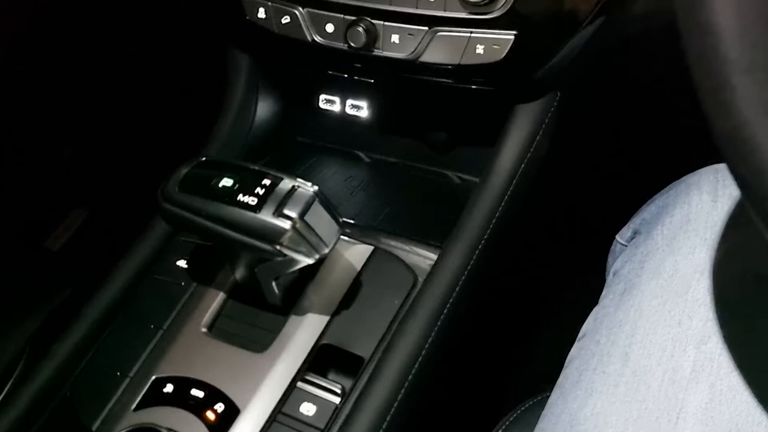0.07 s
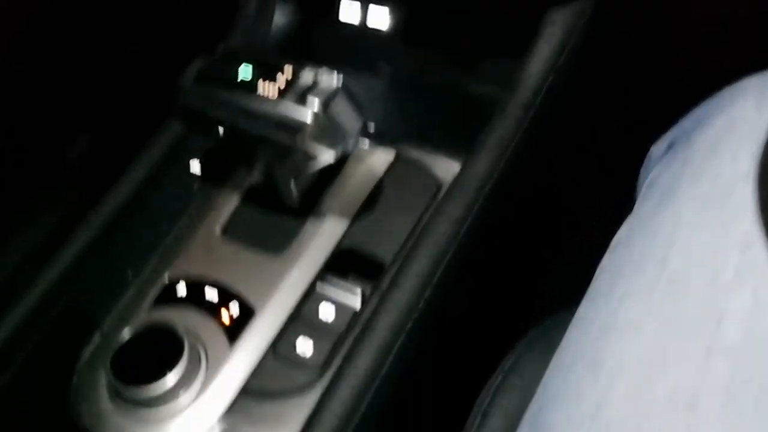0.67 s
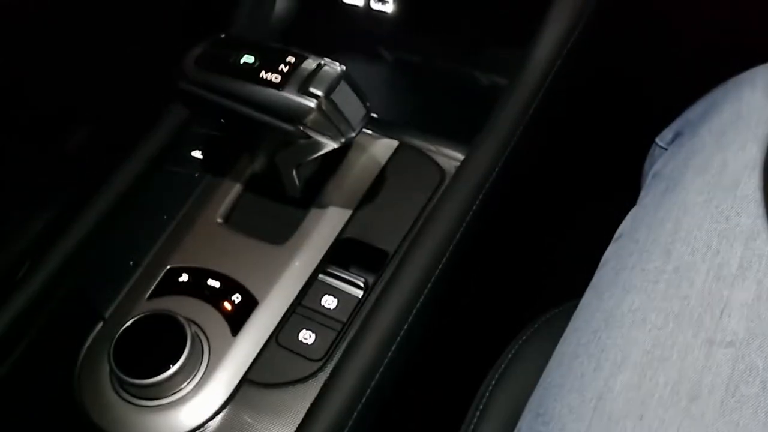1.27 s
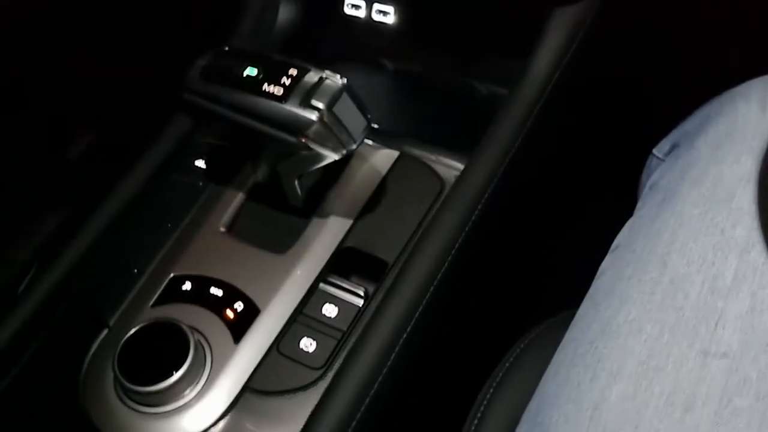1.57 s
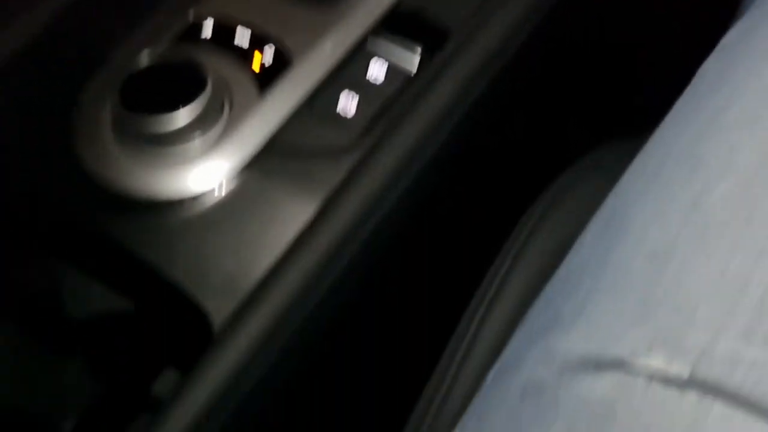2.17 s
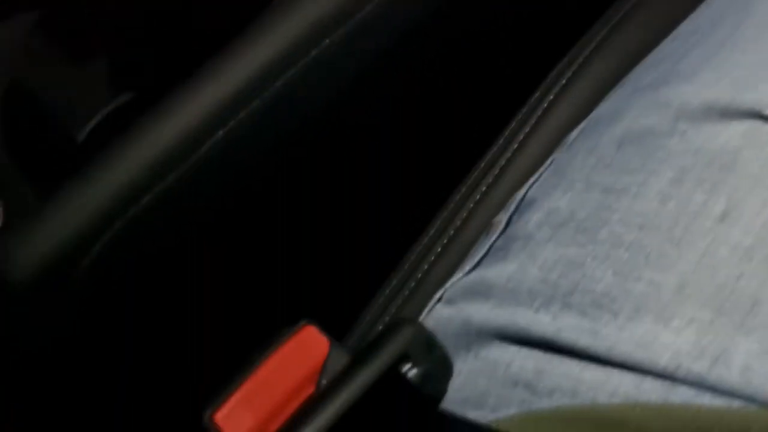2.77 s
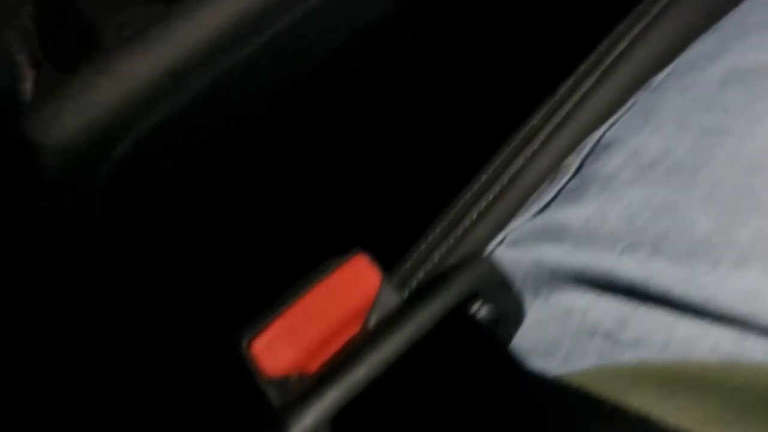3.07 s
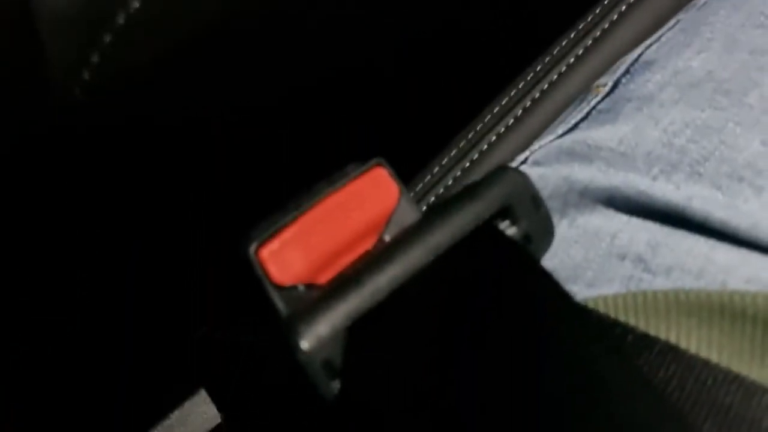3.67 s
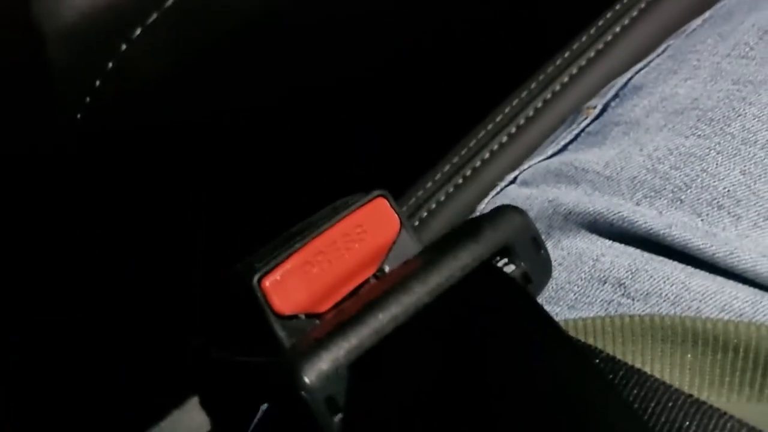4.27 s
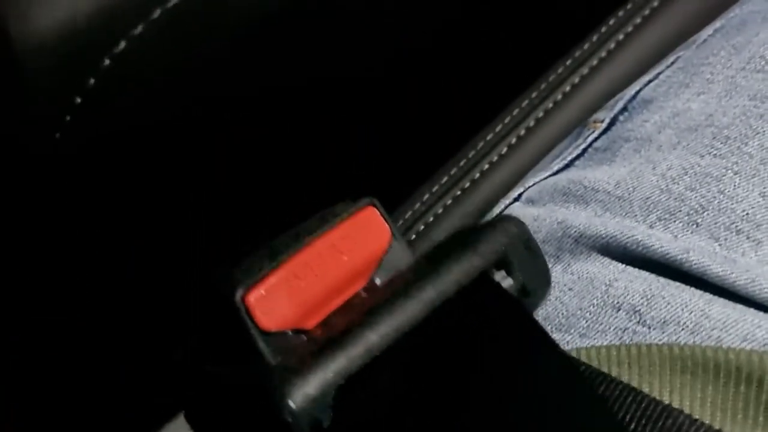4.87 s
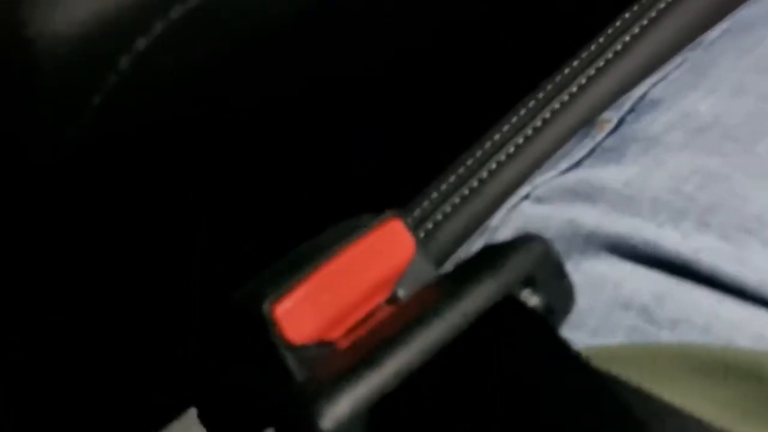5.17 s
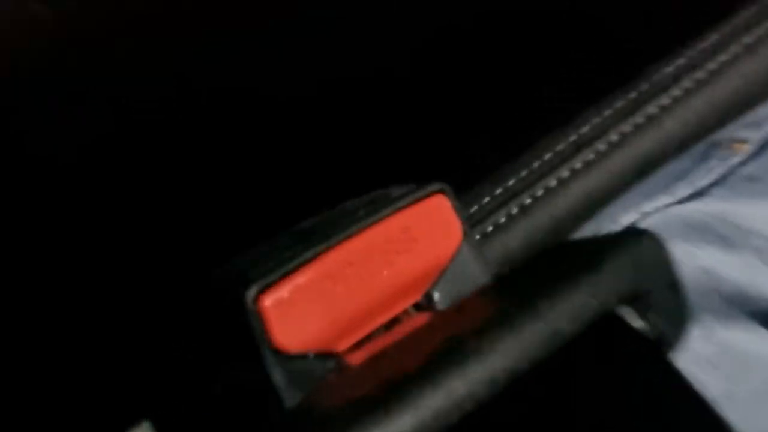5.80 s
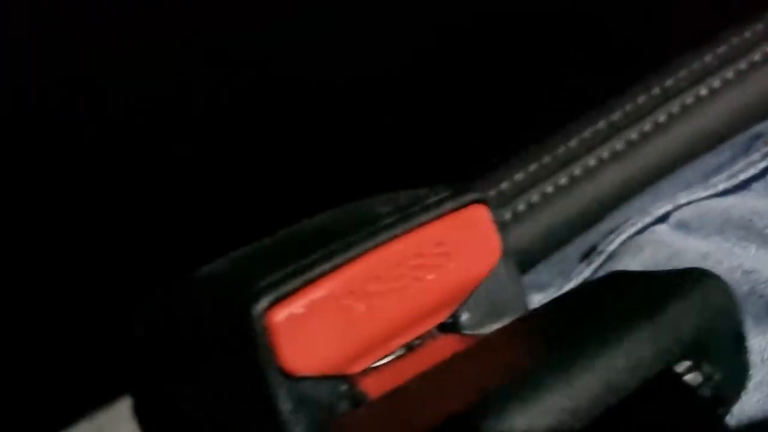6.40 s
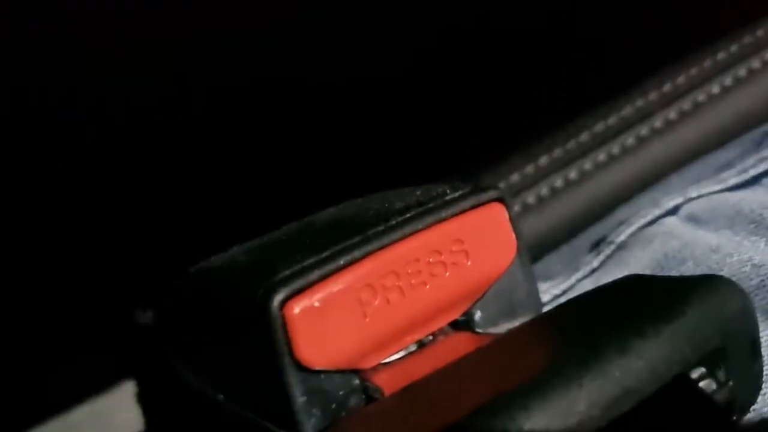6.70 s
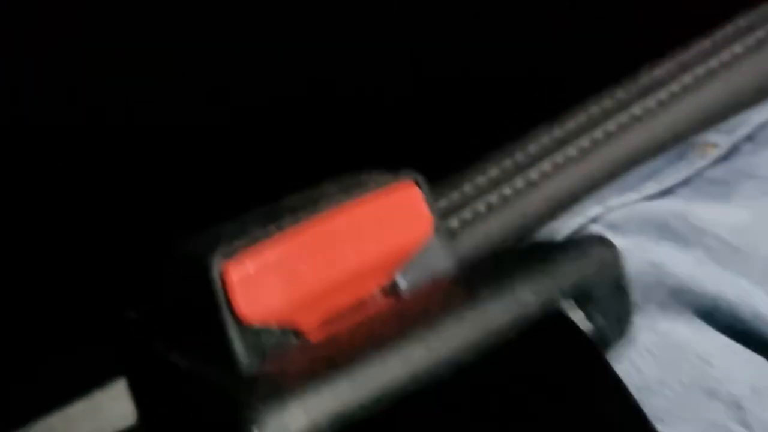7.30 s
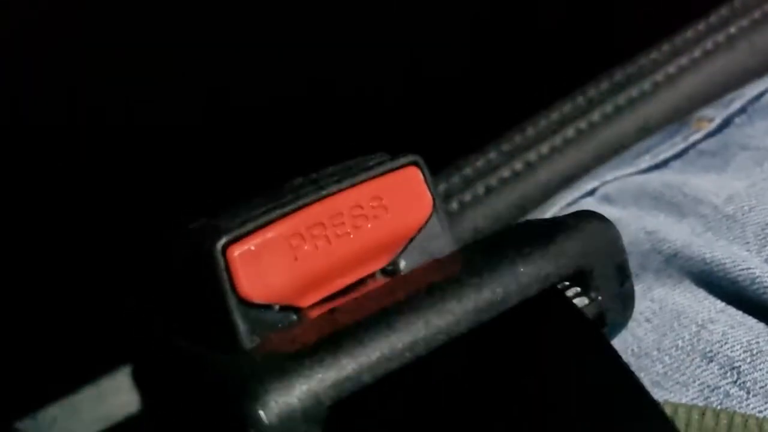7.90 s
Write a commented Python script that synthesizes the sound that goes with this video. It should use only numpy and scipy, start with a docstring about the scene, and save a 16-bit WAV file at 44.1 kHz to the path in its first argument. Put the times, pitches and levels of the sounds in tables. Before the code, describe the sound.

A latched seat belt buckle clicks in sharp, irregular bursts inside an idling car, with soft clothing rustle.

```python
"""Inside an idling car, someone jiggles a latched seat belt buckle.
The engine hums below, and clothes rustle as an arm moves and the hand taps the trim twice.
The buckle's steel tongue slips and catches in bursts of sharp clicks. Each click rings the plastic
housing and dies quickly among the padded seats. The later clicks sound closer and drier."""
import sys
import numpy as np
from scipy import signal
from scipy.fft import rfft, irfft, next_fast_len
from scipy.io import wavfile
from scipy.ndimage import uniform_filter1d, map_coordinates

SR = 44100
rng = np.random.default_rng(int(sys.argv[2]) if len(sys.argv) > 2 else 0)


def wav_out(sig):
    """Save sig, one row per channel (or a flat mono array), as 16-bit PCM at SR to the path in sys.argv[1]."""
    wavfile.write(sys.argv[1], SR, np.round(np.clip(np.atleast_2d(sig).T, -1, 1) * 32767).astype(np.int16))


N = 355005

# the tones in the engine's hum: multiple_of_firing_rate, level_db
HUM_TONES = [(1, -53), (2, -43.5), (3, -47.5), (4, -61), (5, -56), (6, -73)]
# the tone of the engine's rumble: pitch_hz, level_db
RUMBLE_SHAPE = [(20, -16.5), (50, 10.5), (110, 0.5), (170, -11.5), (270, -11.5), (365, -1), (450, -12),
                (545, -6), (630, -20), (720, -11.5), (830, -24), (1300, -21.5), (2000, -33), (3300, -38.5),
                (4500, -43.5), (16000, -59)]
# the rumble grows as the listener sinks between the seats: time_s, gain_db
RUMBLE_GROWTH = [(0, -3.5), (1.8, -1), (3, 0), (6, 0.9), (8, 0)]
# a thin whine under the dashboard: pitch_hz, level_db
WHINE_SHAPE = [(2300, -40.5), (2780, -3), (2860, -3), (2950, -22), (3500, -50.5)]
# how alike a noise is in both ears: pitch_hz, likeness (1 same, -1 opposite)
EAR_LIKENESS = [(60, 0.55), (130, 0.45), (300, 0.68), (640, -0.31), (1400, -0.34), (3100, -0.16),
                (7000, -0.02)]
# strokes of cloth on cloth: start_s, length_s, rub_db, hiss_over_rub_db
CLOTH_STROKES = [(0.524, 0.2, -66.5, -17), (0.588, 0.047, -64, -1), (0.884, .03, -68, -4),
                 (1.01, .05, -72.5, -5), (1.183, .02, -71, -7), (1.793, 0.099, -57.5, -4),
                 (1.965, 0.22, -62.5, -6), (2.254, 0.072, -62, -11), (2.454, 0.22, -59.5, -8.5),
                 (2.873, 0.22, -62.5, -8), (3.15, 0.4, -61, -5), (3.586, 0.2, -56, -8),
                 (3.94, 0.054, -59, -7), (4.18, 0.28, -63.5, -3.5), (4.492, 0.2, -61.5, -4.5),
                 (4.93, 0.041, -58.5, -5.5), (5.048, 0.065, -60, -4), (5.23, 0.11, -64.5, -5),
                 (5.48, 0.18, -56.5, -6.5), (5.738, 0.23, -60.5, -0.5), (6.05, .28, -71, -6.5),
                 (6.41, 0.097, -62, -6), (6.676, 0.055, -61, -7), (7.01, 0.13, -61, -5),
                 (7.185, .27, -62, -5.5), (7.74, 0.091, -75.5, -7.5), (7.899, 0.048, -61, -5.5)]
# the cloth's low rub, higher hiss and highest fizz: pitch_hz, level_db
RUB_SHAPE = [(200, -10), (600, 1), (1200, 2), (2300, 0), (3200, 1), (4000, -3.5), (6000, -15.5),
             (10000, -37)]
HISS_SHAPE = [(2500, -14.5), (5000, -3.5), (8000, -6.5), (9500, -11), (11000, -25.5)]
FIZZ_SHAPE = [(7000, -32.5), (10000, 2), (14000, 7.5), (16000, 0.5)]
# the gliding centre of the cloth's swish: time_s, pitch_hz
SWISH_GLIDE = [(3.1, 2450), (3.5, 2900), (3.8, 3150), (4.5, 3350), (5.55, 3350), (5.8, 2950), (6.7, 3450),
               (7.9, 3150)]
# soft taps of the hand: start_s, level_db
HAND_TAPS = [(2.497, -27.5), (2.663, -33)]
# the tongue catching in the latch: start_s, level_db
LATCH_CLICKS = [(3.9741, -14.5), (3.988, -14.5), (3.9976, -13.5), (4.0104, -17), (4.025, -15.5),
                (4.0487, -15.5), (4.1672, -12.5), (4.2113, -17.5), (4.2463, -20), (4.2768, -23),
                (4.335, -25), (5.0597, -20), (5.0775, -18.5), (5.0972, -19.5), (5.1215, -19),
                (5.1466, -19.5), (5.4346, -11), (5.4654, -20), (5.4835, -24.5), (5.4996, -25.5),
                (5.521, -29.5), (6.4834, -15.5), (6.5006, -17), (6.521, -16.5), (6.6535, -15),
                (7.028, -9.5), (7.0716, -16), (7.0953, -22), (7.1167, -24.5), (7.1458, -28.5), (7.199, -27),
                (8.0444, -21)]
# the tone of steel meeting steel: pitch_hz, level_db
SNAP_SHAPE = [(150, -24), (1000, -11), (2500, -10.5), (3000, -20.5), (3700, -8), (4300, -4), (6500, -1.5),
              (7900, 3), (8800, -8.5), (11500, -20.5), (13200, -15), (16000, -35)]
# the buckle's ringing tones: pitch_hz, level_db, fade_s (time to fall 60 dB)
BUCKLE_TONES = [(205, -21, 0.068), (458.6, -21, .11), (727, -26, 0.046), (1063, -11, 0.062),
                (1390, -25, 0.08), (1807, -17, 0.049), (2243, -15.5, 0.052), (2991, -7.5, 0.026),
                (3092, -15.5, 0.054), (3280, -31.5, 0.076), (4165, -12, 0.05), (5120, -25, 0.057),
                (5134, -17, .05), (5530, -32, 0.071), (6020, -20.5, 0.058), (6200, -13, 0.095),
                (6940, -35, .04), (7900, -25.5, 0.034), (7770, -11.5, 0.062), (13680, -17, 0.014)]
# the tone of the cabin's echo: pitch_hz, level_db
ECHO_SHAPE = [(120, -4), (220, 7), (310, -8), (500, 0), (900, 2.5), (1300, 6), (3100, -5), (3700, -9),
              (4300, -9.5), (8000, -2), (8900, -15.5), (13500, -9.5), (16000, -24)]
# how long the echo takes to fall 60 dB: pitch_hz, fade_s
ECHO_FADE = [(200, 0.12), (1000, 0.087), (4000, 0.084), (8000, 0.062), (14000, 0.016)]
# the listener closes in on the buckle: time_s, nearness (0 to 1)
APPROACH = [(5.5, 0.05), (6.3, 0.99)]
# hard, close clicks have less echo and ring: usual_db, db_per_force_db, close_up_db
ECHO_RULE = (1.8, -.25, -3.5)
# soft clicks are hollow, hard ones bright, and close up the housing's slot stands out:
# pitch_hz, usual_db, db_per_force_db, close_up_db
TONE_RULES = [(200, 1, -0.16, 1.5), (481, -2, -0.1, 4.5), (750, -2, 0.2, 0.5), (1000, 0, -0.13, -6.5),
              (1300, -2, 0, 2.5), (1807, -2.5, 0.08, 1.5), (2285, -1, -0.16, 0), (3000, -2, 0.06, 6),
              (3700, 0, 0, 2.5), (4300, -0.5, 0, 0), (8000, .5, 0.5, -1.5), (11000, 3, 0.5, -5.5),
              (13200, 5.5, .5, -4)]


def amp(db):
    """Turn decibels into a gain."""
    return 10 ** (np.asarray(db) / 20)


def unit(x):
    """Scale a sound to an average power of 1."""
    return x / np.sqrt(np.mean(x ** 2) + 1e-20)


def at_pitch(points, hz):
    """Read between (pitch_hz, value) points on a log pitch scale."""
    pitches, values = np.transpose(points)
    return np.interp(np.log(hz + 1), np.log(pitches + 1), values)


def over_time(points):
    """Join (time_s, value) points into one value per sample."""
    return np.interp(np.arange(N) / SR, *np.transpose(points))


def wobble(rate_hz):
    """A smooth curve through rate_hz random values a second."""
    values = rng.standard_normal(int(N * rate_hz / SR) + 4)
    return map_coordinates(values, [np.arange(N) * rate_hz / SR])


def filtered(x, gain_at):
    """Turn each frequency of a full-length sound up or down."""
    size = next_fast_len(N + SR // 2)
    return irfft(rfft(x, size) * gain_at(np.fft.rfftfreq(size, 1 / SR)), size)[..., :N]


def coloured(x, shape, size=16384):
    """Give a short sound the tone of a (pitch_hz, level_db) shape."""
    cepstrum = irfft(np.log(amp(at_pitch(shape, np.fft.rfftfreq(size, 1 / SR)))))
    cepstrum[1:size // 2] *= 2  # fold the filter so nothing sounds before the hit
    cepstrum[size // 2 + 1:] = 0
    return irfft(rfft(x, size) * np.exp(rfft(cepstrum)))[..., :x.shape[-1]]


def add(track, start_s, sound):
    """Mix a stereo sound into the track."""
    span = track[:, round(start_s * SR):][:, :sound.shape[1]]
    span += sound[:, :span.shape[1]]


def rush(shape, patchy_db):
    """Stereo noise with louder and softer patches, most alike in both ears in the bass."""
    spectra = signal.stft(rng.standard_normal((2, N)), nperseg=512)[2]
    patches = uniform_filter1d(rng.standard_normal(spectra.shape[1:]), size=6, axis=0)
    patches = uniform_filter1d(patches, size=10, axis=1)
    noise = signal.istft(spectra * amp(patchy_db * unit(patches)), nperseg=512)[1][:, :N]

    def gains(hz):
        spread = np.arccos(np.clip(at_pitch(EAR_LIKENESS, hz), -1, 1)) / 2
        return amp(at_pitch(shape, hz)) * np.array([np.cos(spread), np.sin(spread)])

    mid, side = filtered(noise, gains)
    return unit(np.array([mid + side, mid - side]))


def engine(firing_hz=25.03):
    """The engine's firings boom in the cabin as a hum and a throbbing rumble, with a thin whine above."""
    phase = 2 * np.pi * np.cumsum(firing_hz * (1 + .001 * wobble(3))) / SR
    smear = np.pi / 6  # deep tones build up late in the cabin, blending the thumps into a hum
    hum = sum(amp(db) * np.sqrt(2) * np.cos(round(k) * phase + smear * round(k) ** 2)
              for k, db in HUM_TONES)
    purr = sum(amp(at_pitch(RUMBLE_SHAPE, k * firing_hz)) * np.cos(k * phase + rng.uniform(0, 2 * np.pi))
               for k in range(7, 42))
    # four unequal cylinders
    throb_db = 1.4 * np.sin(phase) + 2.1 * np.sin(2 * phase) + .46 * np.sin(phase / 4)
    rumble = amp(-51) * rush(RUMBLE_SHAPE, patchy_db=0) + amp(-61) * unit(purr)
    rumble *= amp(throb_db + over_time(RUMBLE_GROWTH))
    whine = amp(-76) * rush(WHINE_SHAPE, patchy_db=-3)
    return hum * amp([[-.25], [.25]]) + rumble * amp([[.8], [-.8]]) + whine


def arm_strokes(rise_db_per_s=175.5, fall_db_per_s=136):
    """Rub and hiss levels in dB: each stroke of the arm swells, holds and settles more slowly."""
    t = np.arange(N) / SR
    power = amp([[-75.5], [-85]]) ** 2  # the sleeve never quite rests
    for start_s, length_s, rub_db, hiss_over_rub_db in CLOTH_STROKES:
        before_db = rise_db_per_s * np.maximum(start_s - t, 0)
        after_db = fall_db_per_s * np.maximum(t - start_s - length_s, 0)
        gains = amp([[rub_db], [rub_db + hiss_over_rub_db]])
        power = power + (gains * amp(-before_db - after_db)) ** 2
    return 10 * np.log10(power) + over_time([(.475, -7.5), (.495, 0)])  # quieter until the arm stirs


def swish(width_hz=430):
    """Sliding cloth sings in a narrow band of noise whose pitch glides."""
    drift = filtered(rng.standard_normal((2, 2, N)), lambda hz: 1 / (1 + (hz / width_hz) ** 2))
    phase = 2 * np.pi * np.cumsum(over_time(SWISH_GLIDE)) / SR
    return unit(drift[0] * np.cos(phase) + drift[1] * np.sin(phase))


def clothing():
    """Sleeve and denim slide with a grainy rub, a swish and a fine hiss, mostly on the right."""
    rub_db, hiss_db = arm_strokes()
    weave_db = .65 * wobble(40) + .86 * wobble(400)
    swish_gain = amp(-4.5) * over_time([(2.7, .2), (3.2, 1)])  # stands out close to the seat
    rub = amp(rub_db + weave_db + 3.5) * (rush(RUB_SHAPE, patchy_db=2) + swish_gain * swish())
    hiss = amp(hiss_db + weave_db + 3.5) * rush(HISS_SHAPE, patchy_db=2)
    fizz_db = 1.208 * hiss_db + weave_db + 11  # the fizz rises faster than the hiss, so louder rubbing is brighter
    fizz = amp(fizz_db) * rush(FIZZ_SHAPE, patchy_db=-.5)
    return rub * amp([[-2], [1.5]]) + (hiss + fizz) * amp([[-3.5], [2]])


def hand_taps(fade_s=.0088):
    """The hand touches the trim with a dry, dull tick."""
    track, t = np.zeros((2, N)), np.arange(SR // 7) / SR
    dull = [(250, 6), (700, 4.5), (1400, 5.5), (2200, -6), (4000, -17), (8000, -26)]
    for start_s, level_db in HAND_TAPS:
        knock = rng.standard_normal((2, len(t))) * amp(-60 * t / fade_s)
        add(track, start_s, amp(level_db + 2) * coloured(knock, dull))
    return track


def at_ears(x, right_db, lag_s=.0003993):
    """Sound from the buckle reaches the left ear first, as the right is farther away."""
    delay = np.exp(-2j * np.pi * np.fft.rfftfreq(len(x), 1 / SR) * lag_s)
    return np.array([x, amp(right_db) * irfft(rfft(x) * delay, len(x))])


def steel_snap(t):
    """Steel grates on steel for a millisecond or so."""
    burst = (1 - np.exp(-t / .0006)) * np.exp(-(t / .0014) ** 2)
    return coloured(rng.choice([-1, 1], len(t)) * burst, SNAP_SHAPE)


def buckle_ring(t, phase, scatter_db=2):
    """The struck buckle rings at its own pitches, each a little louder or softer every time."""
    pitch_hz, level_db, fade_s = np.transpose(BUCKLE_TONES)[:, :, None]
    strength = amp(level_db + scatter_db * rng.standard_normal(level_db.shape))
    swell = 1 - np.exp(-t * pitch_hz / 2)  # a tone takes a few cycles to build up
    tones = np.sin(2 * np.pi * pitch_hz * t + phase)
    return np.sum(strength * swell * amp(-60 * t / fade_s) * tones, axis=0)


def cabin_echo(t):
    """Sound bounces off seats and trim in a short blur whose treble dies first."""
    hz, age_s, spectra = signal.stft(rng.standard_normal((2, len(t))), SR, nperseg=128)
    alike = at_pitch([(1300, .92), (3500, .11)], hz)[:, None]  # only the lows match in both ears
    spectra[1] = alike * spectra[0] + np.sqrt(1 - alike ** 2) * spectra[1]
    fade = amp(-60 * age_s / at_pitch(ECHO_FADE, hz)[:, None])
    tail = signal.istft(spectra * fade, SR, nperseg=128)[1][:, :len(t)]
    left, right = coloured(tail * (1 - np.exp(-t / .00052)), ECHO_SHAPE)
    brighter = [(400, -4), (1000, -4), (2500, 5.5), (6000, 11), (12000, 5)]
    right = coloured(at_ears(right, right_db=2.5)[1], brighter)
    return np.array([left, right])


def buckle_clicks(usual_click_db=-13.5, burst_gap_s=.25):
    """Each catch of the tongue is a snap, a ring and an echo; force and nearness set its tone."""
    track, t = np.zeros((2, N)), np.arange(SR // 7) / SR
    phase = rng.uniform(0, 2 * np.pi, (len(BUCKLE_TONES), 1))
    previous_s = -1
    for start_s, level_db in LATCH_CLICKS:
        if start_s - previous_s > burst_gap_s:
            burst_echo = cabin_echo(t)  # the echo's paths stay the same within a burst
        previous_s = start_s
        force_db = level_db - usual_click_db
        nearness = np.interp(start_s, *np.transpose(APPROACH))
        weights = [1, force_db, nearness]
        echo_db = np.dot(ECHO_RULE, weights)
        snap = at_ears(amp(12) * steel_snap(t), right_db=-12.5)
        ring = at_ears(amp(.36 * echo_db - 2) * buckle_ring(t, phase), right_db=-4.5)
        echo = amp(echo_db - 12.5) * (1.16 * burst_echo + .5 * cabin_echo(t))
        tone = [(hz, np.dot(rule, weights)) for hz, *rule in TONE_RULES]
        add(track, start_s, amp(level_db) * coloured(snap + ring + echo, tone))
    return track


def scene():
    """Clicks, taps and rustling over the idling engine."""
    return buckle_clicks() + hand_taps() + clothing() + engine()


def record(dry, top_hz=15900):
    """The sound comes in after a tenth of a second, with its very highest treble cut off."""
    opening = amp(over_time([(0, -70), (.102, -45), (.106, 0)]))
    return filtered(dry * opening, lambda hz: 1 / np.sqrt(1 + (hz / top_hz) ** 120))


dry = scene()
out = record(dry)
wav_out(out)
```